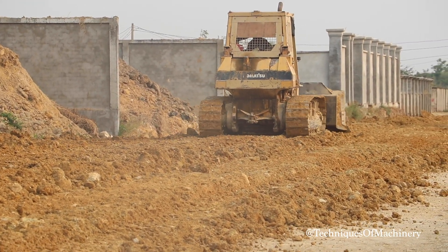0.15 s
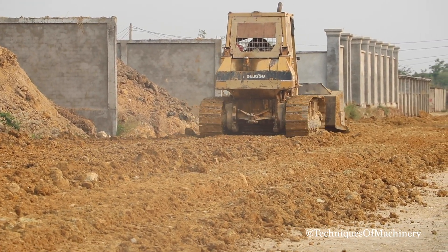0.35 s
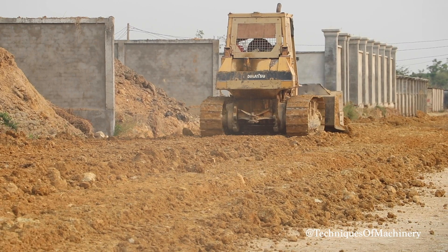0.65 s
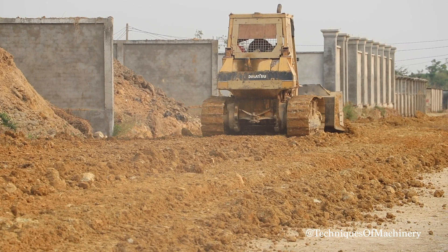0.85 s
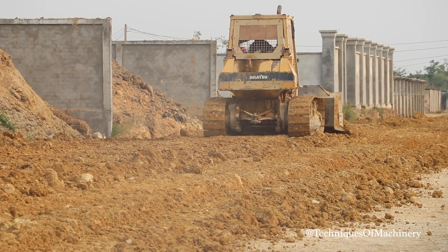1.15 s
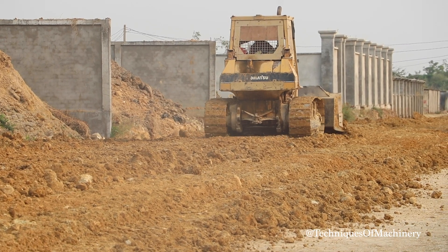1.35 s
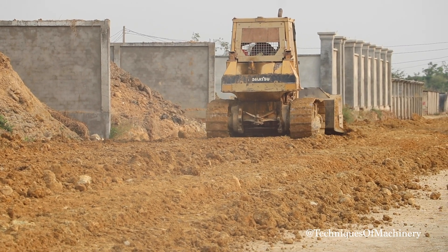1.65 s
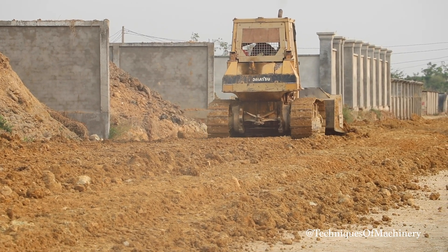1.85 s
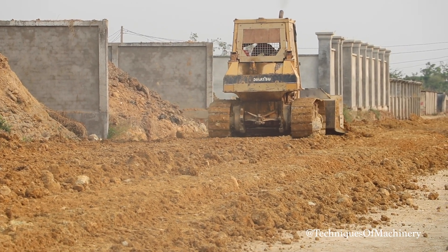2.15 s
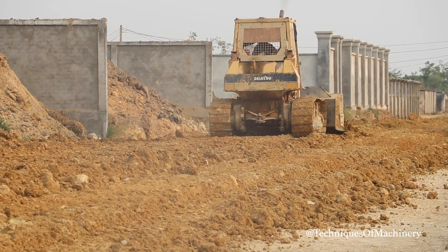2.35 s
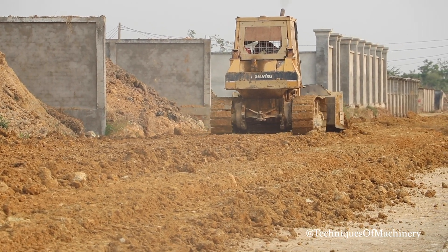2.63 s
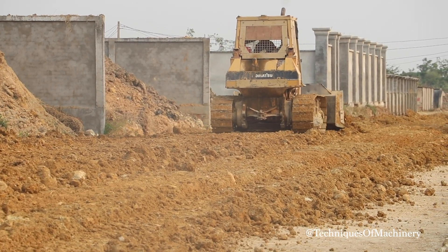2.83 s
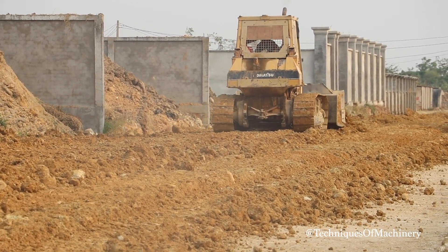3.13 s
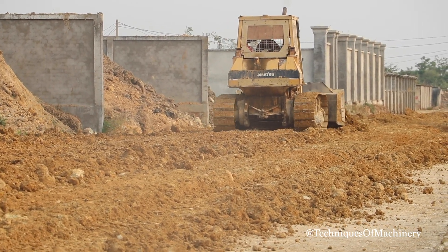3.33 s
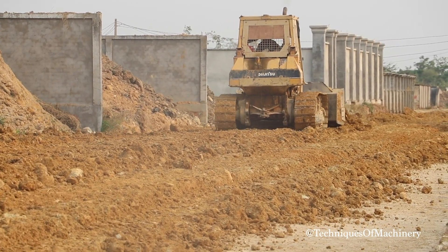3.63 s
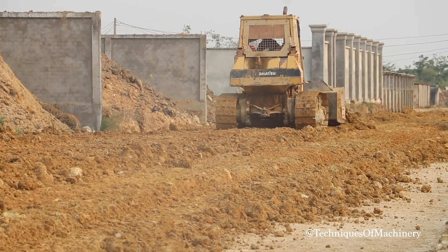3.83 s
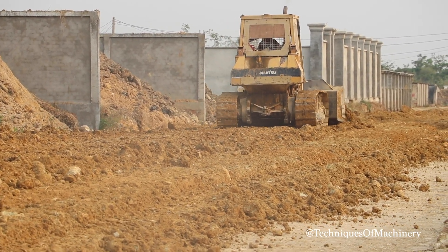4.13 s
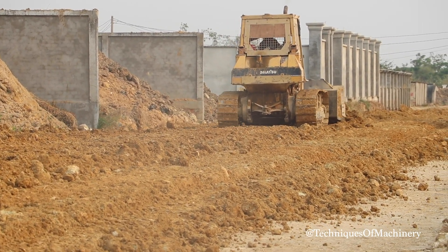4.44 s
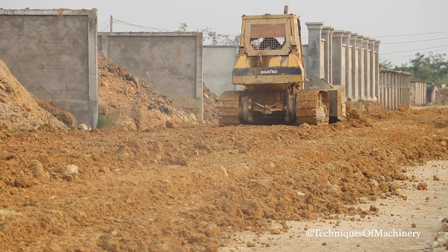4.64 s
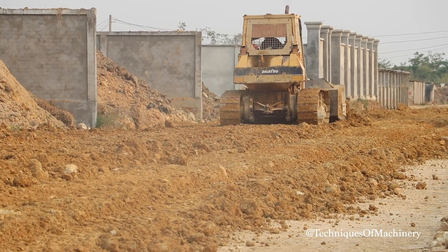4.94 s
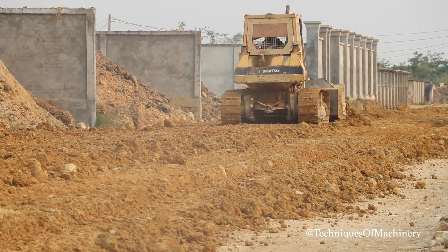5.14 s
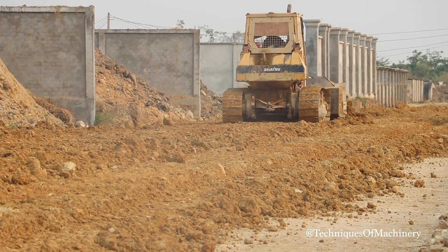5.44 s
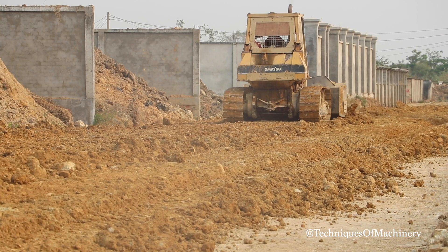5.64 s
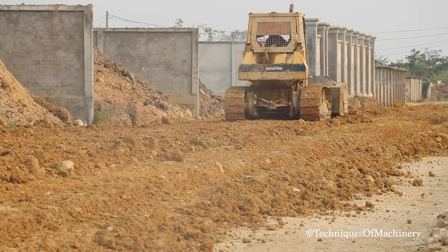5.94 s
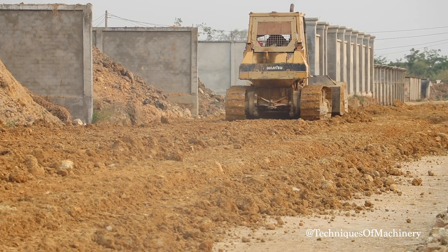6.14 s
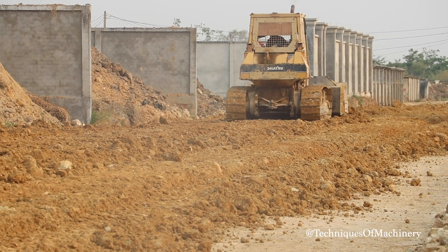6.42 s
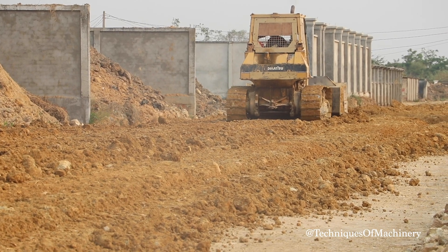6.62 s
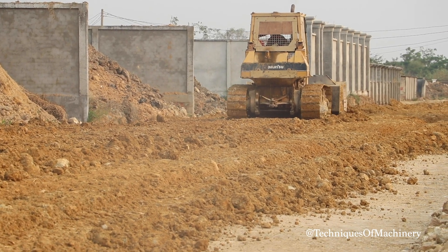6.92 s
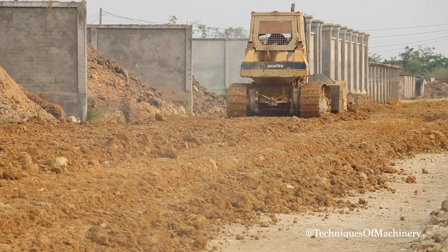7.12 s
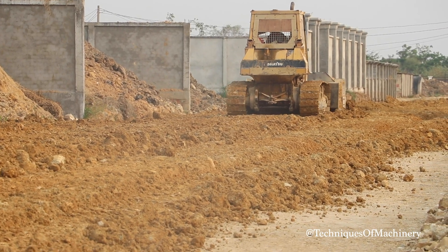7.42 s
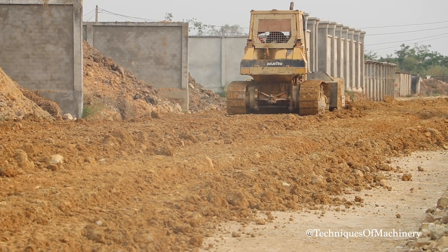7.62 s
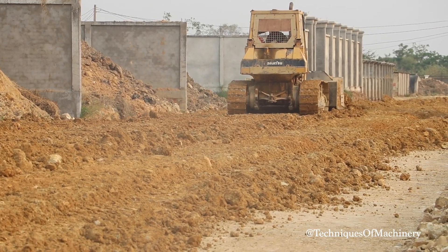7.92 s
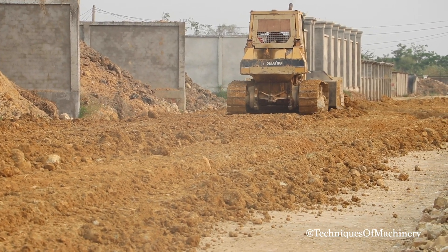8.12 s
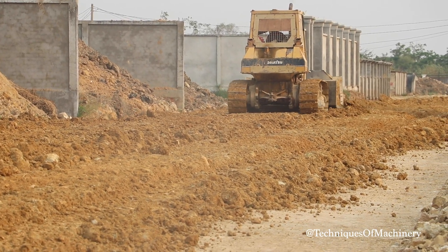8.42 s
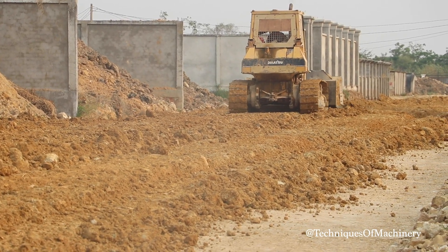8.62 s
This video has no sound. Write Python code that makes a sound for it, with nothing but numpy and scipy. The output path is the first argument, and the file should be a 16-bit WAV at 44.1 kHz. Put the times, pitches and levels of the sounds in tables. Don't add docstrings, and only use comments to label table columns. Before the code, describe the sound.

A diesel crawler dozer drones steadily in a walled yard while its dry tracks squeal and chirp, with grit crunching and steel clinking.

```python
import sys
import numpy as np
from scipy import signal
from scipy.fft import rfft, irfft, next_fast_len
from scipy.io import wavfile
from scipy.ndimage import uniform_filter1d

SR = 44100
rng = np.random.default_rng(int(sys.argv[2]) if len(sys.argv) > 2 else 0)


def unload_wav(signal):
    wavfile.write(
        sys.argv[1],
        SR,
        np.round(np.clip(np.atleast_2d(signal).T, -1, 1) * 32767).astype(np.int16),
    )


def nominal_scale(level):
    x = np.asarray(level, float) / 20
    return 10 ** x


N = 386757


def evened(x):
    return x / np.sqrt(np.mean(x ** 2) + 1e-20)


def read(points, hz, column=1):
    table = np.transpose(points)
    return np.interp(np.log(hz + 1), np.log(table[0] + 1), table[column])


def curve(rows, t, column=1):
    table = np.transpose(rows)
    return np.interp(t, table[0], table[column])


def add(mix, s, sound):
    part = mix[..., round(s * SR):][..., :sound.shape[-1]]
    part += sound[..., :part.shape[-1]]


def drift(hz):
    coarse = rng.standard_normal(N // 32 + 2000)
    smooth = signal.butter(2, hz, fs=SR / 32, output="sos")
    coarse = signal.sosfilt(smooth, coarse)[1500:]
    return np.interp(np.arange(N) / 32, np.arange(len(coarse)), evened(coarse))


# frequency in Hz, left-right likeness from 0 to 1, left minus right in dB.
MICROPHONE_PAIR = [(30, .1, -3), (65, .5, 0), (130, .97, 0), (300, .985, .4), (700, .9, 0), (1400, .8, -.5),
                   (3100, .8, -2), (7000, .9, -2), (15000, .6, -2)]


def noise(field_db, size, alike=1):
    hop = size // 4
    hz = np.fft.rfftfreq(size, 1 / SR)[:, None]
    t = np.arange(N // hop + 5) * hop / SR
    a, b, c, d = rng.standard_normal((len(t), len(hz), 4), dtype=np.float32).T
    same = np.clip(alike * read(MICROPHONE_PAIR, hz), 0, 1).astype(np.float32)
    left = a + 1j * b
    right = same * left + np.sqrt(1 - same ** 2) * (c + 1j * d)
    z = np.array([left, right])
    lean_db = read(MICROPHONE_PAIR, hz, column=2) / 2
    z *= nominal_scale(field_db(hz, t) + np.array([lean_db, -lean_db]))
    unit = hop ** .5 / size * 1.63
    return signal.istft(z * unit, nperseg=size, noverlap=size - hop)[1][:, :N]


def unit_power(colour_db, hz):
    return colour_db - 10 * np.log10(np.mean(nominal_scale(2 * colour_db)))


def patches(hz, t, bins, frames):
    field = rng.standard_normal((len(t), len(hz)), dtype=np.float32).T
    return evened(uniform_filter1d(uniform_filter1d(field, bins, 0), frames, 1))


FIRING_HZ = 97.5
# time in seconds, level in dB.
FIRING_LEVEL = [(0, -22.5), (.95, -27), (1.4, -23), (1.9, -23), (2.1, -25.5), (2.44, -24.5), (2.6, -22.5),
                (4.5, -24), (5.35, -22.5), (5.9, -25.5), (6.86, -24), (7.2, -26.5), (8, -23.5), (8.35, -26),
                (8.77, -25)]
# multiple of the four-stroke cycle, level in dB against the firing tone.
CYCLE_ORDERS = [(3, -21), (4, -24.5), (5, -18.5), (7, -18.5), (8, -22), (9, -16.5), (10, -22), (11, -21.5)]


def exhaust():
    t = np.arange(N) / SR
    cycle = 2 * np.pi * np.cumsum(FIRING_HZ + .12 * drift(1.5)) / SR / 6
    out = nominal_scale(.7 * drift(12)) * np.sin(6 * cycle)
    for order, db in CYCLE_ORDERS:
        level = nominal_scale(db + 2.13 * drift(2.8))
        phase = 7.33 * rng.random() + 0.64 * drift(3.3)
        out = out + level * np.sin(order * cycle + phase)
    lean_db = .25 * drift(1.2)
    out = np.array([out, np.roll(out, -3)])
    return np.sqrt(2) * nominal_scale(curve(FIRING_LEVEL, t) + np.array([lean_db, -lean_db])) * out


WHINE_HZ = [233.3, 466.3, 396, 537, 622, 831, 1161, 2165]
WHINE_DB = [-37, -51, -52.5, -57.5, -50.5, -50, -48, -51]


def whines():
    t = np.arange(N) / SR
    out = np.zeros(N)
    for hz, db in zip(WHINE_HZ, WHINE_DB):
        jitter = .003 * (hz > 600) + .02 * (hz == 622)
        turn = 2 * np.pi * np.cumsum(hz * (1 + .001 * drift(3) + jitter * drift(20))) / SR
        fading = min((hz / 800) ** 1.5, .9)
        level_db = db + fading * (1.73 * drift(1.5) + 4.7 * drift(22.0))
        level_db = level_db - 0.34 * fading * t
        out += np.sqrt(2) * nominal_scale(level_db) * np.sin(turn)
    return out


# time in seconds, roar level in dB, grit hiss level in dB.
ROAR_AND_GRIT = [(0, -26, -49), (.8, -26.5, -43), (1.9, -27.5, -53), (2.8, -26, -45.5), (3.93, -28.5, -48),
                 (4.4, -28, -49), (6.8, -29, -52.5), (7.3, -29.5, -51.5), (8.4, -30, -56.5),
                 (8.77, -29, -43)]
# frequency in Hz, density in dB per Hz.
ROAR_COLOUR = [(20, -22), (45, -4.5), (80, -14.5), (170, -0.5), (330, -1.5), (400, -7.5), (700, -10),
               (1040, -9), (1170, -4), (1400, -7), (1800, -11), (2500, -14), (3600, -18.5), (4600, -29),
               (16000, -57.5)]


def roar():
    def field(hz, t):
        dip_db = (2.0 - 0.49 * t) * np.exp(-(np.log2((hz + 1) / 650) / 0.52) ** 2)
        level_db = unit_power(read(ROAR_COLOUR, hz), hz) + curve(ROAR_AND_GRIT, t) + 3.59
        return level_db + dip_db + 0.99 * patches(hz, t, bins=10, frames=12)
    firing = np.cos(2 * np.pi * FIRING_HZ * np.arange(N) / SR + 1.5 * drift(3))
    knock_db = 1.3 * firing + .6 * drift(9) + .8 * drift(150)
    return noise(field, size=2048) * nominal_scale(knock_db)


WAVER = np.array([drift(60), drift(60), drift(250), drift(22)])


def whisper():
    t = np.arange(N) / SR
    turn = 2 * np.pi * np.cumsum(3250 + 60 * drift(2.4) + 45 * drift(38.8)) / SR
    busy_db = 1.2 * (curve(ROAR_AND_GRIT, t, column=2) + 50)
    return nominal_scale(-61 + busy_db + 3.4 * drift(7.5) + 6.1 * drift(39)) * np.sin(turn)


# time in seconds, pitch in Hz, level in dB.
SQUEALS_EARLY = [
    [(0.072, 3130, -44), (0.095, 3070, -33.5), (0.118, 3050, -50), (0.148, 3250, -42), (0.2, 3080, -44),
     (0.226, 2910, -26.5), (0.25, 2860, -33)],
    [(0.27, 3410, -43), (0.292, 3160, -33), (0.302, 3160, -42), (0.348, 2965, -26.5), (0.366, 3050, -38),
     (0.385, 3200, -39), (0.41, 3200, -47)],
    [(0.41, 3280, -52), (0.46, 2970, -26), (0.494, 3290, -40), (0.516, 3150, -31.5), (0.548, 3100, -43),
     (0.594, 3310, -38), (0.63, 3244, -43)],
    [(1.2, 3150, -45), (1.212, 3289, -36), (1.23, 3250, -44), (1.286, 3230, -35.5), (1.312, 3310, -41),
     (1.354, 3147, -40), (1.36, 3164, -46)],
    [(1.58, 3100, -51), (1.586, 3250, -47), (1.61, 3310, -30.5), (1.622, 3320, -47), (1.632, 3230, -46),
     (1.72, 3250, -37.5), (1.74, 3180, -51)],
    [(2.86, 2910, -54), (2.872, 3248, -47), (2.894, 2927, -25), (2.936, 3200, -46), (2.984, 3250, -36),
     (3.012, 2920, -39), (3.08, 3190, -29)],
]
# time in seconds, pitch in Hz, level in dB.
SQUEALS_MIDDLE = [
    [(3.08, 3160, -33), (3.176, 3210, -45), (3.212, 3170, -31), (3.24, 3130, -50), (3.258, 3140, -39),
     (3.294, 3302, -42), (3.32, 3070, -49)],
    [(3.57, 3240, -45), (3.59, 3170, -33), (3.64, 3230, -52), (3.652, 3210, -36), (3.71, 3180, -28),
     (3.718, 3240, -36.5), (3.85, 3200, -36.5)],
    [(3.85, 3260, -35), (3.904, 3253, -33), (3.916, 3230, -34), (3.958, 3268, -40), (3.966, 3140, -47),
     (3.976, 3254, -34.5), (4.08, 3250, -33.5)],
    [(4.08, 3311, -33), (4.114, 3207, -40), (4.122, 3125, -27), (4.148, 3305, -36.5), (4.246, 3140, -38),
     (4.26, 3350, -27.5), (4.28, 3330, -51)],
    [(4.67, 3260, -50), (4.682, 3270, -35), (4.734, 3270, -37), (4.752, 3010, -40), (4.785, 3250, -52),
     (4.8, 3300, -34), (4.855, 3350, -38)],
    [(4.95, 3320, -48), (4.962, 3230, -39.5), (5.08, 3230, -36), (5.118, 3380, -39), (5.14, 3380, -52),
     (5.2, 3320, -29), (5.256, 3139, -62), (5.33, 3330, -46)],
]
# time in seconds, pitch in Hz, level in dB.
SQUEALS_LATE = [
    [(5.38, 3360, -55), (5.396, 3150, -38), (5.45, 3090, -31), (5.472, 3311, -41), (5.57, 3360, -36),
     (5.584, 3340, -57), (5.6, 3470, -49)],
    [(6.05, 3430, -47), (6.066, 3064, -31), (6.102, 3234, -33), (6.162, 3380, -35), (6.206, 3270, -47),
     (6.222, 3200, -32.5), (6.33, 3190, -40)],
    [(6.33, 3260, -39), (6.37, 3368, -43), (6.406, 3300, -32.5), (6.426, 3327, -43), (6.522, 3440, -33.5),
     (6.544, 3060, -31.5), (6.57, 3190, -40)],
    [(6.74, 3350, -53), (6.75, 3330, -35), (6.775, 3280, -52), (6.79, 3290, -41), (6.84, 3340, -32.5),
     (6.868, 3350, -41), (6.88, 3340, -26.5), (6.9, 3220, -41)],
    [(6.91, 3370, -52), (6.918, 3300, -49), (6.932, 3370, -34), (7.032, 3440, -29.5), (7.04, 3370, -38),
     (7.08, 3160, -42), (7.11, 3350, -49)],
    [(7.11, 3240, -49), (7.118, 3070, -56), (7.126, 3186, -51), (7.16, 3280, -31.5), (7.202, 3292, -47),
     (7.3, 3300, -42), (7.31, 3215, -55)],
]
# time in seconds, pitch in Hz, level in dB.
SQUEALS_BRIEF = [
    [(0.69, 3080, -55), (0.712, 3200, -40), (0.77, 3240, -35), (0.828, 3170, -38), (0.85, 3215, -53)],
    [(2.42, 3260, -57), (2.438, 3260, -44), (2.448, 3350, -38), (2.562, 3270, -33), (2.58, 3430, -54)],
    [(2.65, 3060, -44), (2.68, 3240, -40.5), (2.78, 3050, -49), (2.8, 3330, -40), (2.82, 3302, -51)],
    [(3.345, 3165, -36), (3.398, 3240, -46), (3.412, 3130, -32.5), (3.5, 3180, -31.5), (3.515, 3057, -52)],
    [(4.31, 3390, -56), (4.318, 3202, -47), (4.328, 3380, -38), (4.342, 3250, -32), (4.41, 3420, -44)],
    [(4.55, 3430, -50), (4.572, 3320, -34), (4.592, 3270, -33.5), (4.622, 3360, -42), (4.63, 3290, -48)],
    [(5.88, 3410, -67), (5.89, 3220, -36), (5.898, 3210, -33), (5.936, 3270, -35.5), (5.99, 3250, -44)],
    [(7.65, 3378, -49), (7.694, 3170, -43), (7.706, 3360, -51), (7.766, 3230, -42), (7.79, 3400, -58)],
    [(8.5, 3170, -51), (8.522, 3360, -57), (8.678, 3175, -34.5), (8.744, 3290, -47), (8.77, 3150, -30)],
]
# time in seconds, pitch in Hz, level in dB.
SQUEAL_YELP = [
    (1.11, 3230, -44),
    (1.135, 3200, -38),
    (1.147, 3150, -50),
    (1.151, 2965, -40),
    (1.158, 2955, -23),
    (1.186, 2985, -25),
    (1.2, 3080, -44),
]
SQUEAL_OVERTONES_DB = [-22.5, -31, -41]
# time in seconds, lift of the overtones in dB.
BITE = [(0, 7.5), (1.1, -0.5), (1.7, 7.5), (3.2, 1.5), (3.41, -2), (3.5, 13), (3.83, 2), (3.86, 7),
        (4.08, 16.5), (4.1, 0), (5, -1), (8.77, 7)]


def squeals():
    out = whisper()
    for rows in SQUEALS_EARLY + SQUEALS_MIDDLE + SQUEALS_LATE + SQUEALS_BRIEF + [SQUEAL_YELP]:
        at = np.arange(round(rows[0][0] * SR), min(round(rows[-1][0] * SR), N))
        t = at / SR
        sway, grip, chatter, wander = WAVER[:, at]
        bend = 1 + .007 * sway + .008 * chatter + .009 * np.tanh(3 * wander)
        turn = 2 * np.pi * np.cumsum(curve(rows, t) * bend) / SR
        bite_db = curve(BITE, t) + 3.4 * wander
        tone = np.sin(turn)
        for harmonic, db in enumerate(SQUEAL_OVERTONES_DB, 2):
            tone = tone + nominal_scale(db + bite_db) * np.sin(harmonic * turn)
        level = nominal_scale(curve(rows, t, column=2) + 1.5 + 1.9 * grip + 1.3 * chatter)
        level *= np.clip(3 * grip + 4, .15, 1)
        out[at] += np.sqrt(2) * level * tone * signal.windows.tukey(len(t), 400 / len(t))
    return out


def slip(s, length, hz, db, wobble):
    size = round((length + 0.008) * SR)
    sway, grip, chatter = np.take(WAVER[:3], round(s * SR) + np.arange(size), axis=1, mode="wrap")
    turn = 2 * np.pi * np.cumsum(hz * (1 + wobble * sway)) / SR
    level = nominal_scale(db + 2.1 + 2.8 * grip + 1.2 * chatter)
    ends = signal.windows.tukey(size, min(0.02 / length, 1))
    return s - .004, np.sqrt(2) * level * np.sin(turn) * ends


# start in seconds, length in seconds, pitch in Hz, level in dB.
CHIRPS = [(0.34, 0.036, 4080, -45), (0.595, 0.06, 5400, -49), (0.676, .015, 5340, -49),
          (1.439, 0.016, 3200, -39.5), (1.5, 0.025, 3720, -48), (2.072, 0.04, 3310, -47),
          (1.694, 0.03, 6700, -52), (1.5, .02, 6650, -50), (4.325, 0.038, 6600, -46),
          (4.778, 0.018, 5930, -42), (4.78, .04, 10900, -59), (8.62, 0.014, 11900, -64),
          (0.777, 0.061, 6480, -47), (1.645, 0.056, 3660, -44), (2.47, 0.27, 2150, -42.5),
          (2.513, 0.037, 9950, -47), (2.867, 0.037, 8700, -41.5), (5.3, 0.022, 3350, -38),
          (0.947, .012, 3360, -39), (8.014, 0.021, 3370, -44.5), (8.143, .027, 3260, -38.5),
          (.255, 0.024, 2450, -38), (7.578, .014, 6100, -44), (5.8, .035, 6700, -47),
          (8.53, 0.035, 3330, -42.5), (6.32, .03, 10900, -54), (1.585, .05, 3700, -51),
          (3.002, 0.044, 5980, -45), (4.896, .03, 5770, -52), (4.97, 0.074, 5750, -47),
          (5.01, 0.032, 11450, -55), (5.327, 0.051, 6140, -42.5), (5.694, 0.088, 6380, -45),
          (5.8, .034, 8140, -47), (6.17, 0.072, 8600, -46), (6.96, 0.099, 6820, -47),
          (7.204, 0.043, 6640, -46), (7.227, 0.032, 7570, -31), (7.511, 0.042, 6170, -40),
          (7.818, 0.039, 10540, -48), (8.418, 0.047, 8420, -48)]


def chirps():
    out = np.zeros(N)
    for s, length, hz, db in CHIRPS:
        add(out, *slip(s, length, hz, db, wobble=.007))
    return out


# start in seconds, pitch in Hz, level in dB.
SHORT_CHIRPS = [(.089, 8200, -46), (.195, 9700, -44), (2.078, 5600, -47), (3.174, 9360, -48), (3.465, 5970, -39),
                (3.477, 7570, -39), (3.594, 8230, -38), (3.604, 7240, -31), (3.728, 7230, -27.5),
                (3.76, 6380, -39), (3.788, 6840, -42), (3.8, 3680, -33), (3.73, 3670, -33), (4.551, 4200, -43),
                (4.065, 3900, -40), (3.802, 7340, -30), (4.013, 7250, -34.5), (4.066, 6370, -44),
                (4.08, 7600, -35), (4.116, 6920, -24), (4.199, 7940, -43), (4.208, 9600, -35), (4.59, 5850, -43),
                (6.9, 7680, -40), (7.575, 7260, -47), (8.302, 9300, -51), (8.699, 7260, -39)]


def short_chirps():
    out = np.zeros(N)
    for s, hz, db in SHORT_CHIRPS:
        add(out, *slip(s, 0.021, hz, db, wobble=.007))
    return out


# start in seconds, length in seconds, level in dB, brightness in dB.
SCRAPES = [(.592, 0.035, -35.5, -6.5), (.705, 0.049, -40.5, -9), (1.25, 0.036, -43.5, 1),
           (3.305, 0.062, -34.5, -1.5), (3.448, 0.077, -34, -5.5), (3.569, 0.065, -30, -4),
           (3.722, 0.017, -31, -4), (3.801, 0.016, -30, -3.5), (3.765, 0.011, -42, -3),
           (3.855, 0.034, -42.5, -2), (4.155, .012, -45, -4), (4.246, 0.01, -43, 2), (4.35, 0.018, -39, -2),
           (8.545, .02, -43, -3), (8.71, .05, -47, -2), (4.013, 0.016, -36, -6.5), (4.044, 0.017, -37, -7),
           (4.075, 0.046, -26.5, -0.5), (4.198, 0.022, -36, 1), (5.667, 0.045, -44.5, -4),
           (5.786, 0.038, -40, -3.5), (6.125, 0.048, -40, -2), (6.175, 0.06, -39.5, -3),
           (6.411, 0.029, -36.5, -1), (6.895, 0.028, -40.5, -5)]
# start in seconds, level in dB.
MORE_SCRAPES = [(.091, -40.5), (.246, -40.5), (.67, -52), (.852, -40.5), (.975, -44), (1.042, -44), (1.122, -44),
                (1.373, -41.5), (1.488, -41), (1.657, -42), (2.989, -39.5), (3.382, -38), (3.689, -34.5),
                (4.228, -46), (4.326, -46), (4.465, -50), (4.504, -40), (4.551, -44), (4.58, -48), (5.435, -49),
                (5.508, -43), (5.575, -55), (5.875, -56), (6.28, -51), (6.46, -44), (6.665, -45), (6.705, -47),
                (3.1, -59), (6.264, -42), (6.325, -38.5), (6.497, -38), (6.545, -41), (6.619, -40.5),
                (7.574, -44.5), (8.59, -45), (8.44, -50), (8.67, -43), (8.75, -46)]


def crunches():
    return SCRAPES + [(s, .018, db, -3) for s, db in MORE_SCRAPES]


def squeaks():
    out = np.zeros(N)
    for s, length, db, _ in crunches():
        count = round(3 + 70 * length)
        for when, size, pitch, span in rng.random((12, 4))[:count]:
            hz = 4200 * 3 ** pitch
            squeak_db = db - 12.5 - 12 * abs(pitch - .4) + 6 * size
            add(out, *slip(s + when * length, .003 + .016 * span, hz, squeak_db, wobble=.012))
    return out


# frequency in Hz, density in dB per Hz.
GRIT_COLOUR = [(1500, -9), (2800, 1.5), (4300, -1.5), (5600, 0), (7200, 3.5), (9000, -4.5), (11500, -10.5),
               (15800, -32)]


def grit():
    def field(hz, t):
        colour = unit_power(read(GRIT_COLOUR, hz), hz)
        power = nominal_scale(2 * (colour + curve(ROAR_AND_GRIT, t, column=2) + 5.0))
        octaves = np.clip(np.log2((hz + 1) / 7500), -1, 1)
        chatter_db = 2.8 * patches(hz, t, bins=30, frames=4)
        for s, length, db, bright_db in crunches():
            now = (t > s - .01) & (t < s + length + .06)
            u = t[now] - s
            shape = np.clip(u / .003 + .5, 0, 1) * np.exp(-np.maximum(u - length, 0) / .009)
            tilt_db = 2.0 * (bright_db + 5.0) * octaves
            power[:, now] += nominal_scale(2 * (colour + db + 3.0 + tilt_db + chatter_db[:, now])) * shape
        crunch_db = 2.2 * np.clip(patches(hz, t, bins=50, frames=8), 0, 3) ** 1.6
        return 10 * np.log10(power) + crunch_db + 2.53 * patches(hz, t, bins=3, frames=10)
    return noise(field, size=256, alike=0.83)


# start in seconds, peak level in dB.
PINGS = [(.08, -43), (8.242, -49), (4.948, -47), (7.648, -50), (.925, -46), (1.045, -47), (3.18, -41),
         (5.93, -46), (.222, -43), (.336, -45), (0.4469, -48), (.607, -44), (.727, -41), (5.19, -47),
         (1.1772, -44), (1.273, -40), (1.9101, -39), (2.2947, -39), (3.0033, -40), (3.2465, -41),
         (3.496, -40), (3.7304, -40), (4.241, -31.5), (4.4854, -37), (4.5905, -33), (4.7097, -40),
         (4.8289, -36), (5.0634, -41), (7.0334, -43), (7.1571, -38), (7.2764, -36), (7.4011, -37),
         (7.7493, -44), (8.1322, -45)]


def pings():
    out, t = np.zeros(N), np.arange(3500) / SR
    ping = (1 - np.exp(-t / 0.0024)) * nominal_scale(-60 * t / .04) * np.sin(2 * np.pi * 4752 * t)
    for s, db in PINGS:
        add(out, s, nominal_scale(db + 8.5) * ping)
    return out


# start in seconds, peak level in dB.
TICKS = [(3.571, -25), (3.691, -23), (3.741, -17), (3.804, -23), (4.045, -27), (4.052, -22), (4.079, -20),
         (4.2, -26), (4.324, -35), (4.362, -32), (4.552, -24), (5.73, -30), (5.872, -34), (5.945, -39),
         (6.265, -33), (8.408, -31), (8.53, -30)]


def ticks():
    out, t = np.zeros(N), np.arange(500) / SR
    band = signal.butter(3, [4500, 11500], "bandpass", fs=SR, output="sos")
    for s, db in TICKS:
        burst = evened(signal.sosfilt(band, rng.standard_normal(len(t))))
        add(out, s, nominal_scale(db - 10 - 60 * t / .014) * burst)
    return out


# start in seconds, level in dB.
KNOCKS = [
    (1.586, -31),
    (4.269, -27),
]


def knocks():
    out, t = np.zeros(N), np.arange(1500) / SR
    band = signal.butter(2, [700, 3500], "bandpass", fs=SR, output="sos")
    for s, db in KNOCKS:
        burst = evened(signal.sosfilt(band, rng.standard_normal(len(t))))
        add(out, s, nominal_scale(db - 60 * t / 0.069) * burst)
    return out


def track_steel():
    return squeals() + chirps() + short_chirps() + squeaks() + pings() + ticks() + knocks()


def walls(x, t60, gap_s):
    size = SR // 4
    taps = np.zeros((2, size))
    at = np.arange(round(gap_s * SR), size - 20, 20)
    at = at + rng.integers(0, 20, (2, len(at)))
    np.put_along_axis(taps, at, rng.choice([-1., 1.], at.shape), 1)
    taps *= nominal_scale(-60 * np.arange(size) / SR / t60)
    return signal.oaconvolve(x[None], taps / np.linalg.norm(taps[0]), axes=1)[:, :N]


# start in seconds, end in seconds, level in dB.
INSECT_PHRASES = [
    (-.1, .24, -54),
    (.6, .85, -63),
    (2.15, 2.63, -54),
    (2.68, 3.02, -54),
    (4.96, 5.34, -51),
    (5.66, 5.9, -65),
    (6.62, 7.02, -53),
    (7.4, 7.63, -67),
]
# frequency in Hz, density in dB.
INSECT_COLOUR = [(4500, -15), (6200, -4.5), (9500, -17), (11800, -10.5), (12750, 1), (13300, -5),
                 (14400, -5), (15800, -27)]


def insect():
    def field(hz, t):
        slow = np.clip(hz / 12000, .5, 2) ** 3
        swell = 0
        for start, end, db in INSECT_PHRASES:
            edge = np.minimum((t - start) / .03, (end - t) / .03)
            swell = swell + nominal_scale(db + 11.5) * np.clip(edge / slow, 0, 1)
        rasp_db = 1.5 * patches(hz, t, bins=12, frames=3)
        return unit_power(read(INSECT_COLOUR, hz), hz) + 20 * np.log10(swell + 1e-6) + rasp_db
    left, right = noise(field, size=512, alike=1.2)
    return np.array([left, np.roll(right, 1)]) * nominal_scale(np.array([[-2.5], [2.5]]))


def scene():
    steel = track_steel()
    near = nominal_scale(np.array([[-1.8], [1.8]])) * steel
    echoes = nominal_scale(-12.5) * walls(steel, t60=0.14, gap_s=0.0072)
    left, right = exhaust() + whines() + roar() + grit() + near + echoes + insect()
    size = next_fast_len(N)
    hz = np.fft.rfftfreq(size, 1 / SR)
    lag = 2 * np.pi * hz / SR * 1.3 / (1 + (hz / 7500) ** 2)
    left = irfft(rfft(left, size) * np.exp(-1j * lag), size)[:N]
    return np.array([left, right])


def band_limit(x):
    return signal.sosfilt(signal.butter(12, 15790, fs=SR, output="sos"), x)


def record(dry):
    hiss = nominal_scale(-70) * rng.standard_normal(dry.shape)
    limit = signal.firwin(255, 15790, window=("kaiser", 9), fs=SR)
    mix = signal.oaconvolve(dry + hiss, limit[None], "same")
    return band_limit(mix)


dry = scene()
out = record(dry)
unload_wav(out)
```